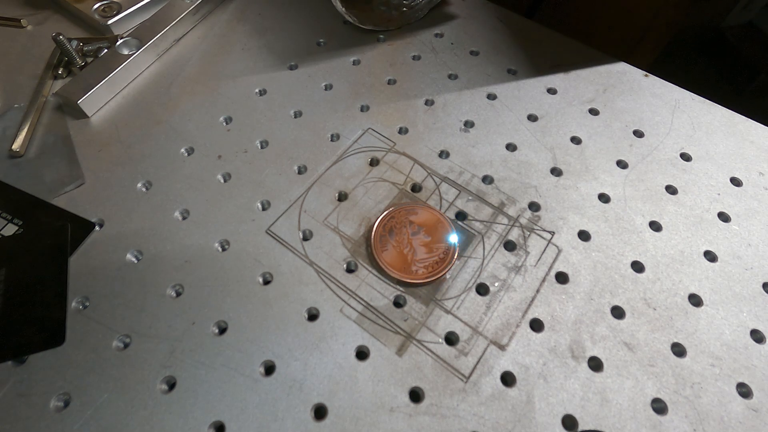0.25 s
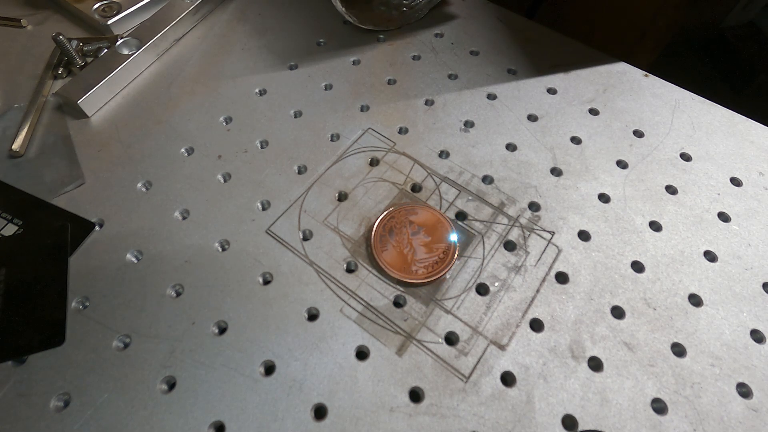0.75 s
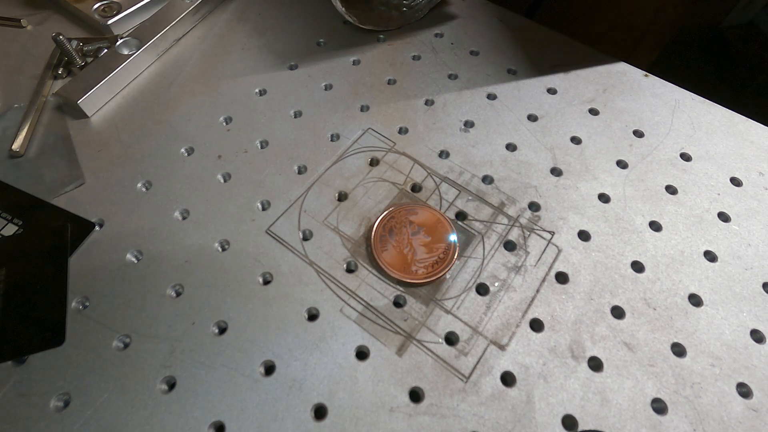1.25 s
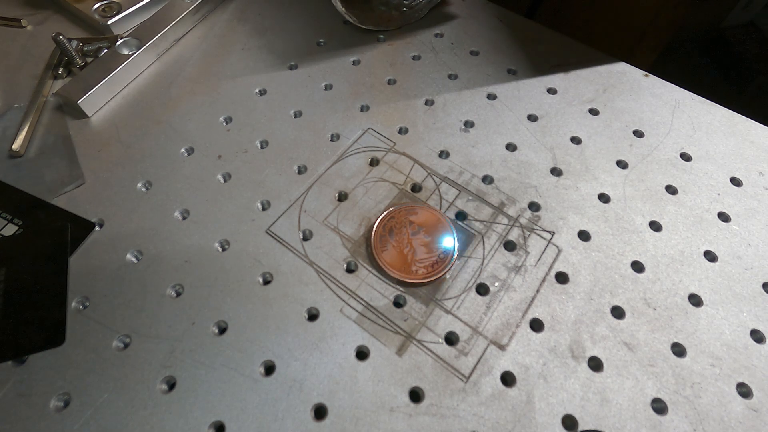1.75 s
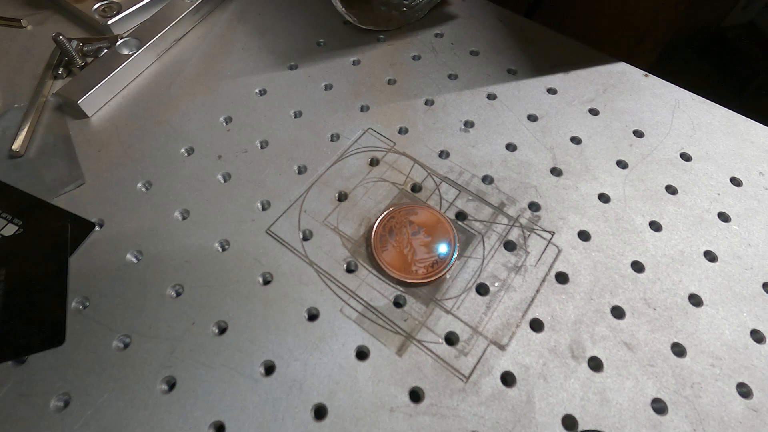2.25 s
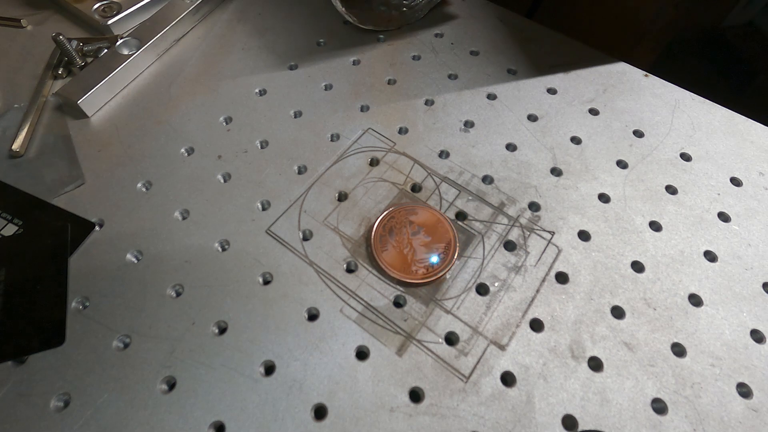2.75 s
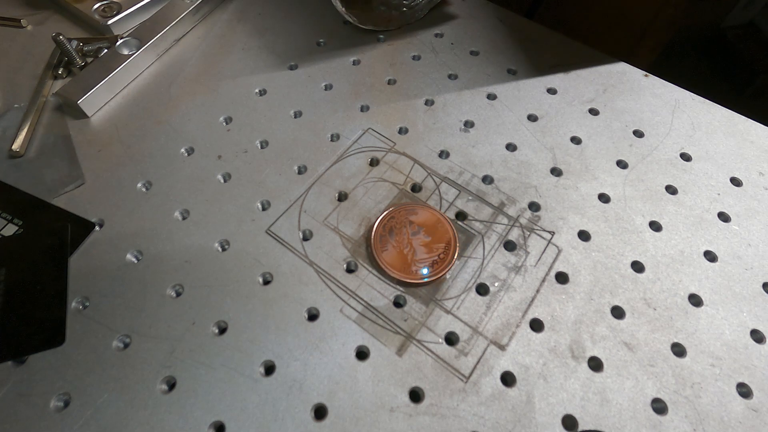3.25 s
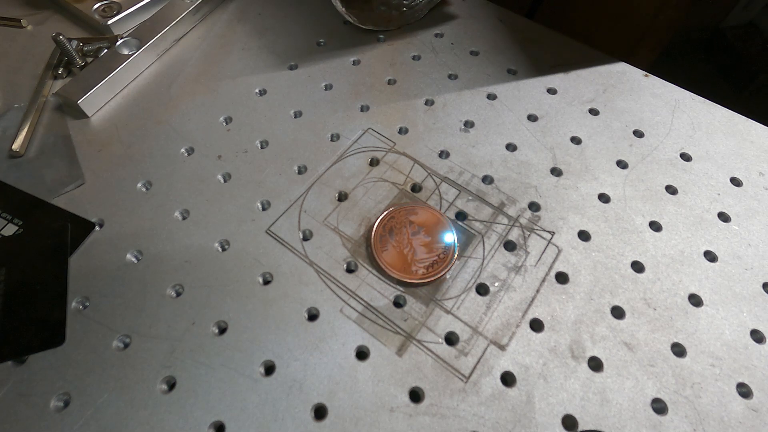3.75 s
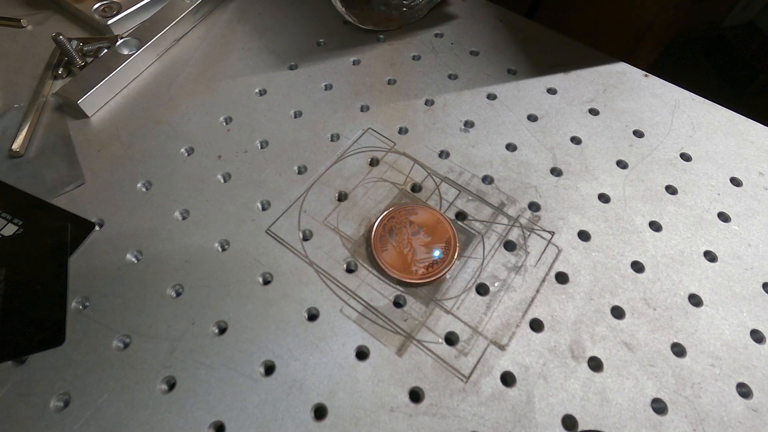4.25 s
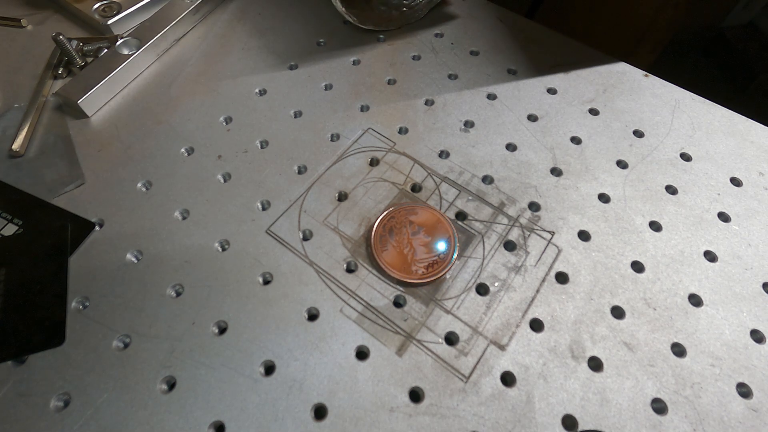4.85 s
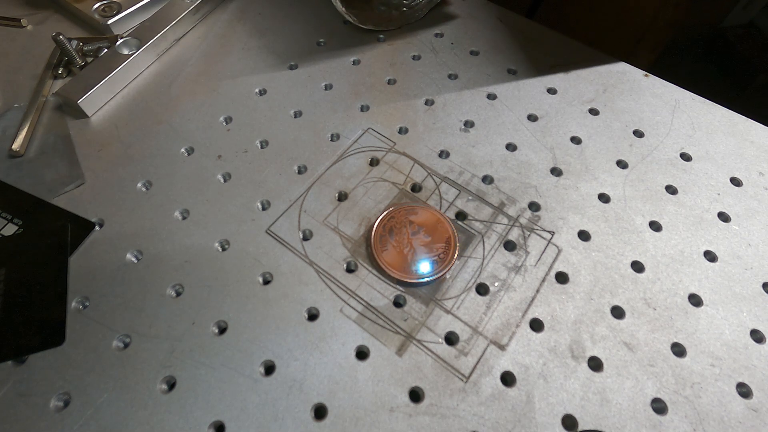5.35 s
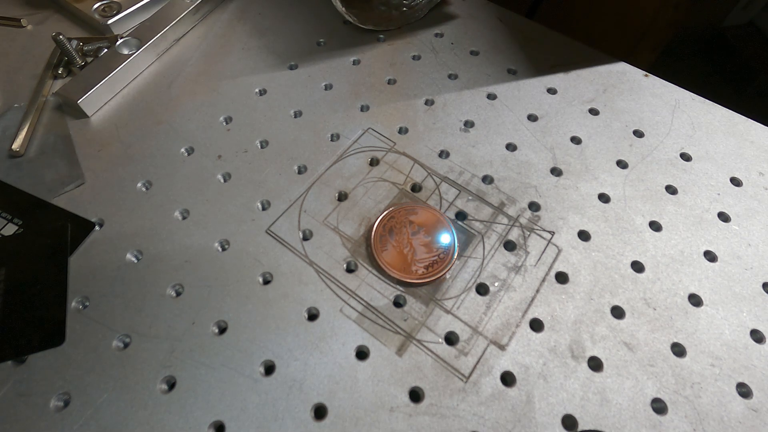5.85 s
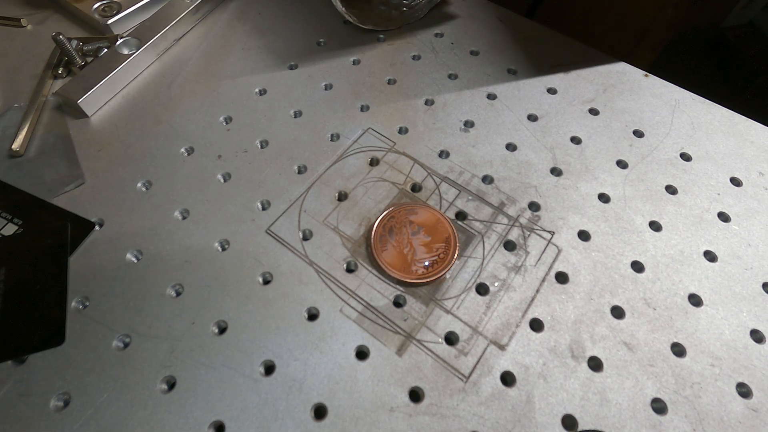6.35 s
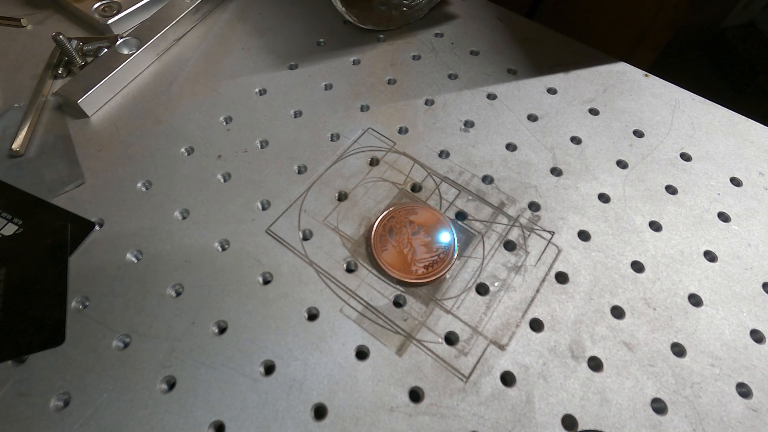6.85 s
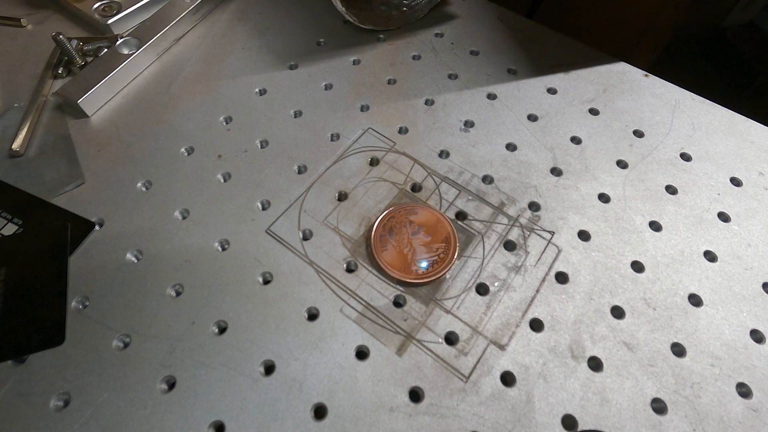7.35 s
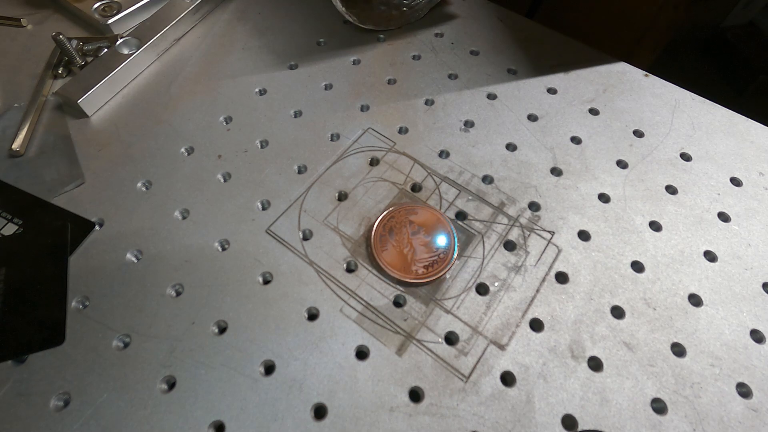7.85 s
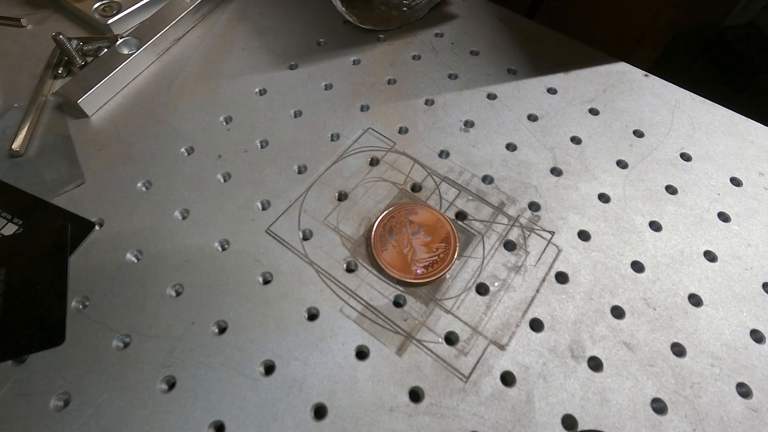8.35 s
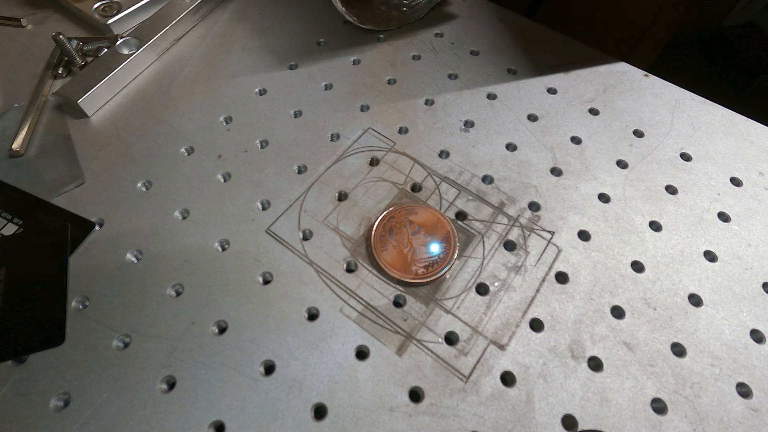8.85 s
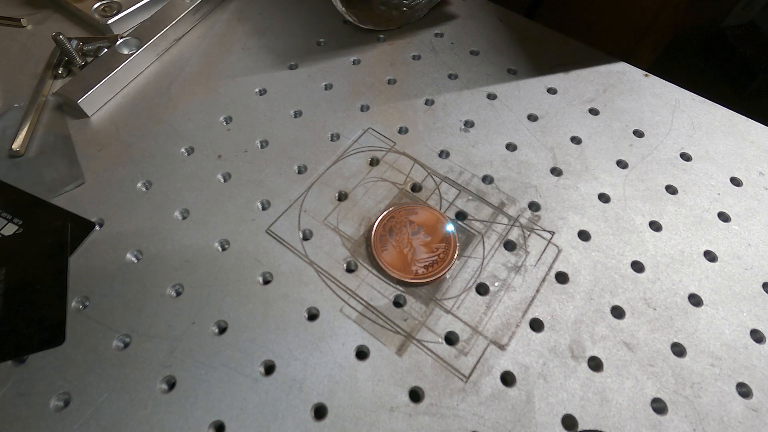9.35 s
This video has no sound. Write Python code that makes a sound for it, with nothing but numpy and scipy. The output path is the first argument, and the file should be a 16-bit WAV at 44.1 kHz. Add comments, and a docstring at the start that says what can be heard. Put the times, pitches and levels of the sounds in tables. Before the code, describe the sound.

A pulsed laser engraves a copper coin, its bright metallic hiss chopped into a fast, fluttering buzz with low thuds, five or six sweeps a second.

```python
"""Laser engraving a coin

A pulsed laser burns a picture into a coin on a steel table, line by line, about five or six lines a second.
Each shot is a tiny blast. Together they make a hiss, shaped noise whose loudness follows the picture, so it
buzzes, a little changed on every line. Vapour knocks and thuds as pulses at sharp contours, and swells or
collapses at broad edges. Nearby metal colours the hiss with resonances; a small workshop sounds behind it."""
import sys
import numpy as np
from scipy import signal
from scipy.fft import rfft, irfft
from scipy.io import wavfile
from scipy.ndimage import uniform_filter1d

SR = 44100
rng = np.random.default_rng(int(sys.argv[2]) if len(sys.argv) > 2 else 0)


def dump(signal):
    """Clip the signal to [-1, 1] and save it as 16-bit WAV at the path in sys.argv[1]."""
    limited = np.clip(np.atleast_2d(signal).T, -1, 1)
    pcm = np.round(limited * 32767).astype(np.int16)
    wavfile.write(sys.argv[1], SR, pcm)


N = 422919

# the picture: engraved lines, points along each line, and when the first sweep begins
LINE_COUNT, STEPS, FIRST_LINE_S = 51, 600, .013

# Contours where the vapour flares loudly on every crossing. Places are shares of a sweep.
# Each row: first line, last line, place on the first line, place midway, place on the last line,
# flare strength in dB, inrush of air in dB relative to the flare, knock strength in relative dB.
FLARE_CONTOURS = [(38, 50, .093, .089, .091, -19.5, -12, -11), (21, 29, .127, .129, .139, -16.5, -13, -8),
                  (9, 15, .168, .16, .18, -18, -16, -8), (16, 21, .194, .2, .196, -19, -9, -4),
                  (22, 28, .193, .192, .193, -22, -6, -2), (29, 36, .194, .197, .205, -15, -14, 3),
                  (37, 39, .208, .211, .214, -19.5, -14, -2), (40, 50, .198, .196, .195, -27, -16, -16),
                  (0, 5, .235, .257, .275, -18.5, -18, -2), (6, 16, .263, .254, .255, -23, -16, -5),
                  (11, 20, .312, .32, .318, -22, -18, -5), (4, 12, .392, .402, .397, -20, -20, -6),
                  (9, 14, .477, .48, .49, -22, -16, -6), (0, 3, .577, .581, .583, -20, -16, -2),
                  (0, 8, .675, .663, .654, -16.5, -16, 2), (0, 8, .737, .724, .712, -23, -16, -2),
                  (0, 18, .785, .757, .72, -18.5, -16, 1), (0, 9, .808, .79, .775, -26, -16, -12),
                  (19, 27, .723, .731, .742, -22, -14, -1), (21, 37, .812, .78, .772, -16.5, -18, 2),
                  (38, 42, .772, .775, .783, -18, -16, -3), (26, 31, .833, .832, .83, -21, -14, 0),
                  (10, 20, .797, .79, .775, -23, -16, -5), (42, 49, .826, .812, .803, -16, -15, -1),
                  (35, 41, .862, .846, .831, -25, -16, -9)]


def undb(db):
    """Turn decibels into a gain."""
    return 10 ** (np.asarray(db) / 20)


def level(x, db):
    """Set the average (rms) level in dB."""
    return x * undb(db) / np.sqrt(np.mean(x ** 2))


def curve(points, hz):
    """Read a curve of (Hz, dB) points, with straight lines on a log-frequency axis."""
    f, db = np.transpose(points)
    return np.interp(np.log(hz + 1), np.log(f), db)


def colour(x, points, rings=(), share=1, size=8192):
    """Filter a sound with a smooth spectrum plus resonances, never answering before the input."""
    hz = np.arange(size // 2 + 1) * SR / size
    smooth_db = share * curve(points, hz)
    rings_db = sum(lift / (1 + (2 * (hz - f) / width) ** 2) for f, width, lift in rings)
    # folding the cepstrum forward in time gives the minimum-phase filter
    cepstrum = irfft(np.log(undb(smooth_db + rings_db)))
    cepstrum[1:size // 2] *= 2
    cepstrum[size // 2 + 1:] = 0
    response = irfft(np.exp(rfft(cepstrum)))
    return signal.fftconvolve(x, response)[:N]


def line_seconds():
    """Duration of each sweep: sweeps lengthen ever more slowly down the coin."""
    first_s, grow_s_per_line, ease_s_per_line2 = .161917, .0013422, 7.395e-6
    line = np.arange(LINE_COUNT)
    return first_s + grow_s_per_line * line - ease_s_per_line2 * line ** 2


def draw(table, profile):
    """Paint curved strokes onto the lines; profile gives the cross-section of a stroke along the sweep."""
    picture, place = np.zeros((LINE_COUNT, STEPS)), np.arange(STEPS) / STEPS
    for first, last, start, middle, end, *shape in table:
        lines = np.arange(int(first), int(last) + 1)
        s = np.linspace(0, 1, len(lines))[:, None]
        # a smooth bend through the three given places
        centre = start * (1 - s) * (1 - 2 * s) + 4 * middle * s * (1 - s) + end * s * (2 * s - 1)
        picture[lines] += profile(place - centre, line_seconds()[lines, None], *shape)
    return picture


def relief(size, count):
    """Fine random detail, averaged over size steps and over count neighbouring lines."""
    detail = uniform_filter1d(rng.standard_normal((LINE_COUNT, STEPS)), size, axis=1)
    return level(uniform_filter1d(detail, count, axis=0), 0)


def sweep(picture):
    """What the beam meets over time as it runs through the picture line by line."""
    starts = FIRST_LINE_S + np.r_[0, np.cumsum(line_seconds())]
    travelled_lines = np.interp(np.arange(N) / SR, starts, np.arange(len(starts)))
    return np.interp(travelled_lines * STEPS, np.arange(picture.size), picture.ravel())


def broad_strokes():
    """The broad strokes of the picture, which are spared or burnt deeper."""
    # Places and widths are shares of a sweep. Each row: first line, last line, place on the first line,
    # place midway, place on the last line, half width, relative burn in dB (negative is spared).
    stroke_rows = [(0, 50, .077, .041, .019, .009, -9), (0, 50, .125, .085, .052, .008, -3.5),
                   (30, 47, .132, .128, .132, .038, -16), (48, 50, .14, .145, .15, .025, -10),
                   (18, 29, .165, .155, .155, .015, -10), (7, 17, .16, .175, .185, .025, -5),
                   (29, 50, .289, .256, .236, .026, -16), (41, 50, .21, .21, .21, .016, -7),
                   (12, 50, .45, .366, .313, .022, -16), (12, 21, .44, .405, .36, .018, -8),
                   (23, 50, .525, .452, .418, .014, -12), (18, 50, .55, .435, .38, .016, -5),
                   (1, 7, .538, .521, .511, .024, -8), (24, 26, .55, .55, .55, .03, -17),
                   (41, 43, .497, .497, .498, .018, -14), (35, 50, .515, .51, .512, .007, -6),
                   (19, 23, .575, .565, .56, .028, -6), (16, 50, .655, .592, .555, .007, -7),
                   (19, 50, .697, .63, .595, .009, -9), (27, 50, .72, .69, .68, .06, 2),
                   (41, 50, .86, .85, .845, .02, 2), (0, 50, .835, .86, .862, .02, 2),
                   (0, 50, .878, .892, .893, .013, -7), (0, 50, .922, .925, .922, .017, 2.5),
                   (0, 50, .98, .962, .955, .024, -12), (21, 21, .36, .36, .36, .026, -15),
                   (17, 17, .51, .51, .51, .016, -14), (16, 16, .68, .68, .68, .014, -12),
                   (19, 19, .82, .82, .82, .014, -11)]

    def flat_topped(offset, line_s, width, db):
        return db * np.exp(-(offset / width) ** 8)

    return draw(stroke_rows, flat_topped)


def rosettes():
    """How strongly oval rosettes shade the beam, and where their two thin nested outlines run."""
    # Each row covers those before it: centre line, centre place as a share of a sweep, half height in lines,
    # half width as a share of a sweep, lean in shares per line, outer outline (0 to 1),
    # inner outline (0 to 1), shade (0 to 1).
    rosette_rows = [(-4, .597, 10.5, .045, 0, .5, .5, 1), (3, .505, 14, .06, .0003, .7, 0, 1),
                    (3, .688, 11.5, .05, -.001, .7, .7, 1), (8, .359, 12, .044, .0003, .7, .85, 1),
                    (15.5, .283, 12.5, .044, .0002, .85, .95, 1), (28.5, .213, 12.5, .038, .0003, .9, 1, 1),
                    (15.5, .757, 13, .046, -.0013, .45, .4, .8), (29, .803, 11, .038, -.0009, .55, .6, .6),
                    (36, .775, 7, .026, -.0006, .6, .7, .4), (25, .122, 4, .013, .001, .9, 0, 1),
                    (42, .079, 5.5, .011, -.0003, .9, 0, 1), (12, .508, 4.5, .026, .0005, .6, 0, 1)]
    # inner outline as a share of the radius; outline thickness as a share of a sweep
    inner_radius, ring_width = 0.36, 0.0041
    line, place = np.arange(LINE_COUNT)[:, None], np.arange(STEPS) / STEPS
    petals = outlines = np.zeros((LINE_COUNT, STEPS))
    for row, at, height, width, lean, outer, inner, shade in rosette_rows:
        radius = np.hypot((line - row) / height, (place - at - lean * (line - row)) / width)
        outer_ring = outer * np.exp(-((radius - 0.99) * width / ring_width) ** 2)
        inner_ring = inner * np.exp(-((radius - inner_radius) * width / ring_width) ** 2)
        covered = radius < 1 + ring_width / width
        petals = np.where(covered, shade, petals)
        outlines = np.where(covered, outer_ring + inner_ring, outlines)
    return petals, outlines


def burn(petals, outlines):
    """How hard the beam burns over time, in dB: strokes, rosettes and fine detail added up."""
    stroke_contrast, petal_db, ring_db, fine_db = 0.92, -3.5, 0.5, 2.26
    # the rosette outlines hide the strokes under them
    strokes = stroke_contrast * broad_strokes() * (1 - outlines)
    depth_db = strokes + petal_db * petals + ring_db * outlines + fine_db * relief(size=5, count=4)
    # the metal takes only so much of the beam
    return np.minimum(sweep(depth_db), 4.)


def workshop():
    """The steady workshop: low, dull noise, separate on the left and right."""
    # Each row: frequency in Hz, relative strength in dB per Hz.
    shop_spectrum = [(20, -41), (100, -23), (300, -7.5), (700, -19), (2000, -21), (8000, -57), (16000, -25)]
    return np.array([level(colour(rng.standard_normal(N), shop_spectrum), -47.5) for _ in range(2)])


def stirred_air(thuds, air_db):
    """Air over the work rumbles in eddies, louder where the vapour pushes harder."""
    # Each row: frequency in Hz, relative strength in dB per Hz.
    air_spectrum = [(15, 4), (28, -4.5), (42, -3.5), (65, 9.5), (100, -4), (200, -12.5), (400, -29.5),
                    (1000, -22.5), (4000, -66)]
    stir_power = 0.51  # how closely the air follows the vapour
    push = uniform_filter1d(np.abs(thuds[0]), size=SR // 45)
    stir = level(push ** stir_power, 0)
    # the air eddies in much the same way on neighbouring lines
    eddies = level(colour(sweep(relief(size=2, count=6)), air_spectrum), 0)
    return eddies * stir * undb(air_db)


def swells(swell_db=-1.17, uneven_db=0.74):
    """The cloud swells and collapses on the same edges line after line, never quite equally."""
    # Broad edges with a deep thump; places and widths are shares of a sweep. Each row: first line, last line,
    # place on the first line, place midway, place on the last line, half width,
    # relative pressure (positive swells, negative collapses).
    swell_rows = [(0, 50, .117, .078, .053, .012, .06), (0, 50, .07, .04, .025, .012, -.025),
                  (22, 50, .345, .32, .292, .009, .06), (25, 27, .29, .295, .3, .018, .1),
                  (25, 27, .34, .34, .34, .025, -.07), (8, 17, .425, .415, .4, .025, -.04),
                  (19, 30, .465, .435, .41, .008, .05), (19, 50, .5, .415, .373, .009, -.07),
                  (28, 50, .54, .49, .472, .011, -.1), (33, 50, .48, .458, .455, .009, .05),
                  (35, 50, .53, .528, .535, .01, .07), (29, 50, .625, .598, .585, .007, .065),
                  (18, 27, .635, .617, .603, .007, -.05), (20, 36, .56, .575, .585, .035, .028),
                  (0, 8, .485, .492, .505, .011, -.09), (9, 16, .508, .52, .528, .019, -.155),
                  (8, 16, .565, .568, .57, .016, .12), (9, 16, .6, .6, .6, .03, .06),
                  (0, 5, .598, .608, .62, .014, -.2), (5, 9, .68, .677, .675, .011, -.18),
                  (10, 14, .695, .697, .7, .01, -.16), (14, 23, .75, .733, .735, .009, -.07),
                  (38, 50, .13, .128, .125, .022, -.04), (9, 17, .325, .325, .33, .022, .05),
                  (11, 23, .285, .285, .28, .014, -.04), (21, 42, .89, .89, .885, .009, .015),
                  (9, 16, .545, .55, .552, .012, -.04), (0, 50, .895, .905, .905, .018, -.045),
                  (5, 43, .94, .94, .937, .01, .075), (0, 50, .975, .972, .968, .025, -.025)]

    def bulge(offset, line_s, width, pressure):
        return pressure * np.exp(-(offset / width) ** 2)

    edges = draw(swell_rows, bulge)
    return sweep(edges * undb(swell_db + uneven_db * relief(size=40, count=2)))


def puff(age_s, rise_s):
    """A vapour cloud shoves the air out quickly and lets it flow back four times more slowly."""
    age = np.maximum(age_s / rise_s + 1, 0)
    return age * (np.exp(1 - age) - np.exp(1 - age / 4) / 4 ** 2)


def flare(offset, line_s, db, inrush_db, knock_db):
    """One puff, a slower rush of air back into the cloud, then a smaller second puff."""
    rise_s, after_s, after_db = 0.0014, 0.00884, -18
    inrush_s, inrush_delay_s = 0.0033, 0.0048
    age_s = offset * line_s
    inrush = undb(inrush_db) * puff(age_s - inrush_delay_s, inrush_s)
    second = undb(after_db) * puff(age_s - after_s, rise_s)
    return undb(db) * (puff(age_s, rise_s) - inrush + second)


def small_flares(outlines, uneven_db, small_db=-51.0, rise_s=0.00088):
    """Small puffs of vapour wherever the beam crosses a rosette outline."""
    crossings = sweep(outlines * undb(2 * uneven_db * relief(size=20, count=4)))
    one_puff = puff(np.arange(SR // 10) / SR - rise_s, rise_s)
    return level(signal.fftconvolve(crossings ** 2, one_puff)[:N], small_db)


def surges(burn_db, surge_db=-43.5):
    """The vapour pushes softly on the air whenever the burn grows or shrinks."""
    # Each row: frequency in Hz, relative strength in dB per Hz.
    surge_spectrum = [(20, -2), (45, 1.5), (90, -7), (130, -1.5), (200, -6.5), (400, -23.5), (800, -46),
                      (2000, -54)]
    delay_s = .0035  # the cloud answers the burn a little late
    vapour_share = 0.25  # dB of vapour per dB of burn
    vapour = np.interp(np.arange(N) - delay_s * SR, np.arange(N), undb(vapour_share * burn_db))
    return level(colour(np.gradient(vapour), surge_spectrum), surge_db)


def plume(burn_db, outlines, flare_db=3, uneven_db=0.73, swirl_db=-45):
    """The vapour thuds: loud flares on contours, small ones on outlines, swirls and soft surges."""
    # The small cloud radiates its slowest swell poorly. Each row: frequency in Hz, gain in dB.
    thud_curve = [(20, -5), (50, -3), (100, -1), (200, 0.5), (350, -2), (700, -12), (1500, -11.5)]
    # Torn edge of a flaring cloud. Each row: frequency in Hz, relative strength in dB per Hz.
    swirl_spectrum = [(40, 6.5), (120, 1.5), (230, 6), (480, -2.5), (750, -14.5), (1200, -6.5), (3000, -62)]
    loud = sweep(draw(FLARE_CONTOURS, flare) * undb(flare_db + uneven_db * relief(size=20, count=1)))
    flares = loud + small_flares(outlines, uneven_db)
    # every flare tears into a brief swirl, a different one on each side
    gust = np.maximum(flares, 0)
    swirl = np.array([colour(rng.standard_normal(N) * gust, swirl_spectrum) for _ in range(2)])
    return colour(flares, thud_curve) + surges(burn_db) + level(swirl, swirl_db)


def bite(offset, line_s, db, inrush_db, knock_db):
    """The short, hard push of the first bite into a contour, just ahead of its flare."""
    lead_s, length_s = 0.002914, 0.00049
    return undb(knock_db) * np.exp(-((offset * line_s + lead_s) / length_s) ** 2)


def knocks(knock_db=-47, grit=1.8, uneven_db=0.6):
    """Every loud flare opens with a push roughened by noise: a gritty knock, different on each side."""
    # Each row: frequency in Hz, gain in dB.
    knock_curve = [(60, -29), (200, -4.5), (420, 3), (660, 3), (900, -3), (1500, -4), (3500, -9),
                   (7000, -27)]
    pushes = sweep(draw(FLARE_CONTOURS, bite) * undb(uneven_db * relief(size=20, count=1)))
    sides = [colour(pushes * (1 + grit * rng.standard_normal(N)), knock_curve) for _ in range(2)]
    return level(np.array(sides), knock_db)


def blasts(scatter_db=3.5):
    """Uneven tiny blasts, so dense that they fuse into noise."""
    strength = undb(scatter_db * rng.standard_normal(N))
    return level(rng.standard_normal(N) * strength, 0)


def blast_band(hz, kind):
    """Fresh blasts limited to one range of frequencies."""
    return signal.sosfilt(signal.butter(4, hz, kind, fs=SR, output="sos"), blasts())


def shots(burn_db, sizzle_db, sheen_db, petal, outline):
    """Blasts hiss in three bands that follow the burn: coarse rasp, brighter sizzle and the highest sheen."""
    # The shots as they arrive. Each row: frequency in Hz, relative strength in dB per Hz.
    shot_spectrum = [(100, 3), (600, -5.5), (1200, -11), (2300, -8.5), (3000, -5), (4200, -6), (5600, -7),
                     (6600, -6.5), (7200, -2.5), (9200, -3.5), (10000, -4.5), (12400, -4.5), (13500, -15),
                     (15800, -24)]
    # Resonances of the nearby metal and the microphone openings, with the hollows between them.
    # Each row: frequency in Hz, width in Hz, lift in dB (negative is a hollow).
    metal_rings = [(1400, 90, 4.5), (1676, 90, 3.5), (1862, 70, 5), (2150, 150, 2), (2770, 220, 4),
                   (3480, 250, 2.8), (3680, 200, 5.7), (4230, 200, -2), (4480, 220, 4.5), (4800, 220, 2.5),
                   (5133, 110, 5), (5580, 150, -2), (6146, 200, 5), (6570, 180, -5), (6950, 350, 2),
                   (7775, 220, 2.5), (8420, 220, -4), (8897, 220, 5), (10000, 350, -2.5), (10635, 200, 5.5),
                   (11370, 250, 7), (12185, 220, 5), (12620, 250, 3.5)]
    sizzle_hz, sheen_hz = 6000, 10300  # where the sizzle and the sheen begin
    coarse_power, sizzle_power, sheen_power = 0.79, 1.17, 1.17  # dB of hiss per dB of burn
    rasp_db, sheen_petal_db = 3, -4.5  # rosettes sound duller: more coarse hiss, less sheen
    crackle_db = 5.5  # coarse hiss gained on a rosette outline
    sheen_rise_db, grain_db, spurt_db, spit_db = 6, 2.34, 1.74, -16

    # specks of metal spit at random, about 200 a second
    spits = (rng.random(N) < 200 / SR) * rng.standard_normal(N)
    # the grain of the metal roughens the coarse part on its own
    grain = np.tanh(sweep(relief(size=12, count=2)))
    coarse_db = coarse_power * burn_db + rasp_db * petal + crackle_db * outline + grain_db * grain
    coarse = (blast_band(sizzle_hz, "low") + level(spits, spit_db)) * undb(coarse_db - rasp_db / 2)

    sizzle = blast_band([sizzle_hz, sheen_hz], "band") * undb(sizzle_power * burn_db + sizzle_db)

    # the sheen brightens towards the far end of every sweep
    along = sweep(np.tile(np.linspace(-.5, .5, STEPS), (LINE_COUNT, 1)))
    spurts = sweep(relief(size=30, count=3))
    sheen_gain_db = sheen_power * burn_db + sizzle_db + sheen_db + sheen_petal_db * petal
    sheen_gain_db = sheen_gain_db + sheen_rise_db * along + spurt_db * spurts
    sheen = blast_band(sheen_hz, "high") * undb(sheen_gain_db)
    return level(colour(coarse + sizzle + sheen, shot_spectrum, metal_rings), 0)


def reflections(x, room_db, room_t60_s):
    """Dense echoes off the table and the machine die away quickly, different on each side."""
    t = np.arange(SR // 2) / SR
    tail = rng.standard_normal((2, len(t))) * undb(-60 * t / room_t60_s) * (t > .001)
    tail *= undb(room_db) / np.linalg.norm(tail[0])
    return x + signal.fftconvolve(x[None], tail, axes=1)[:, :N]


def engraving_hiss(*burning):
    """The hiss with its echoes, plus hiss scattered from the sides because the burning spot moves."""
    # Share of the hiss that arrives from the sides. Each row: frequency in Hz, gain in dB.
    scatter_curve = [(300, -1), (1200, -11.5), (3000, -7.5), (9000, -8), (11500, -10.5), (13000, -1),
                     (15800, 1)]
    # opposite signs left and right make the scattered part sound wide
    scattered = colour(shots(*burning), scatter_curve) * np.array([[1], [-1]])
    return reflections(shots(*burning), room_db=-16, room_t60_s=0.04) + scattered


def scene():
    """The picture sets the burn; hiss, vapour and stirred air sound over the steady workshop."""
    # Slow drift of the work. Each row: time in seconds, hiss level in dB, extra sizzle in dB,
    # extra sheen in dB, stirred air level in dB.
    work_drift = [(0, -30, 1.5, -1.5, -39), (1, -31, 2.5, -0.5, -33), (1.8, -29.5, 1.5, 0.5, -41.5),
                  (2.5, -32, 3, -1, -39.5), (3.2, -30, 2, 0, -36), (4.6, -30.5, 2.5, -1, -32),
                  (6, -29.5, 2, 0, -37.5), (7.2, -30.5, 2.5, -1.5, -34.5), (8.4, -30, 1.5, 0.5, -32),
                  (9.6, -29.5, 1.5, -1, -39)]
    s, *columns = np.transpose(work_drift)
    hiss_db, sizzle_db, sheen_db, air_db = (np.interp(np.arange(N) / SR, s, c) for c in columns)
    petals, outlines = rosettes()
    burn_db = burn(petals, outlines)
    thuds = plume(burn_db, outlines) + swells()
    air = stirred_air(thuds, air_db)
    hiss = engraving_hiss(burn_db, sizzle_db, sheen_db, sweep(petals), sweep(outlines)) * undb(hiss_db)
    return workshop() + air + thuds + knocks() + hiss


def record(dry):
    """The two microphone openings hear differently, the right one with more bass; the top is cut."""
    # Left minus right, split evenly between the two. Each row: frequency in Hz, difference in dB.
    side_difference = [(60, -5.8), (130, -6.2), (220, -8.5), (380, -8), (700, -4.5), (1300, -2),
                       (2400, -1.3), (7000, -1), (10000, -1.5), (11500, .8), (12700, -.8), (13800, -5),
                       (15500, 0)]
    sides = np.array([colour(x, side_difference, share=side / 2) for x, side in zip(dry, (1, -1))])
    top_hz = 15600
    return signal.sosfilt(signal.ellip(10, .2, 80, top_hz, fs=SR, output="sos"), sides)


dry = scene()
out = record(dry)
dump(out)
```